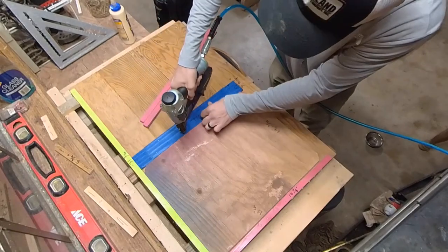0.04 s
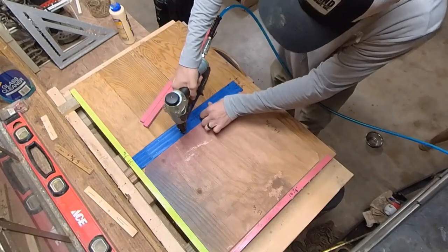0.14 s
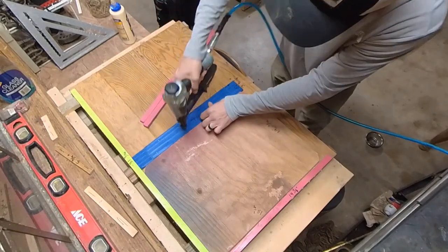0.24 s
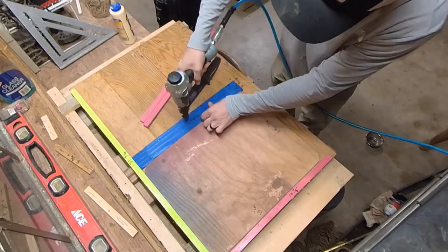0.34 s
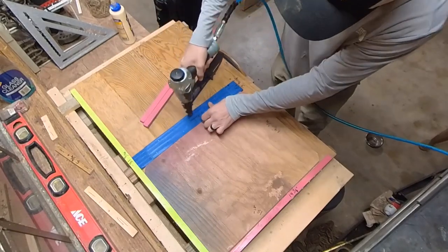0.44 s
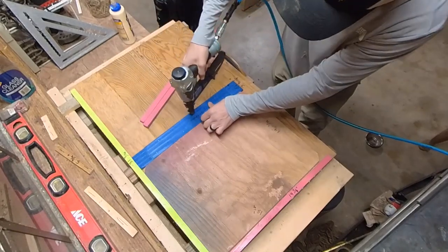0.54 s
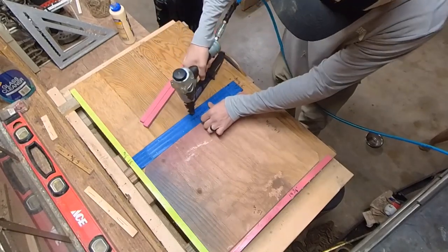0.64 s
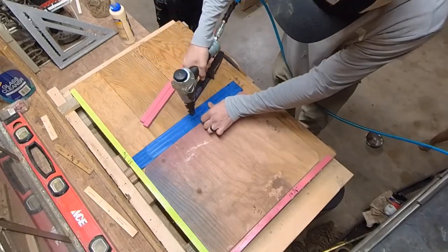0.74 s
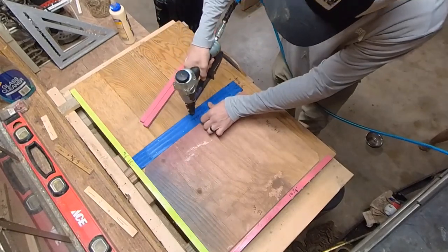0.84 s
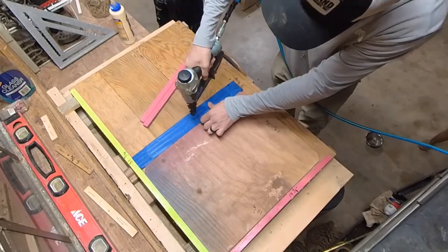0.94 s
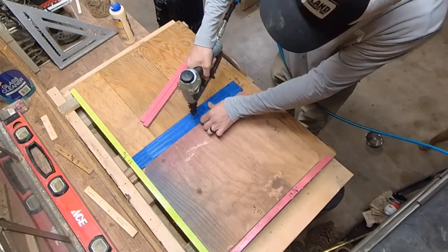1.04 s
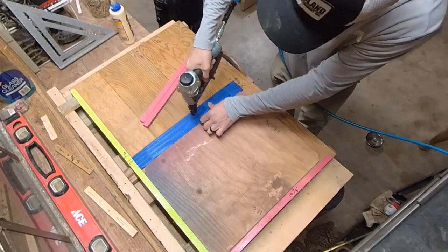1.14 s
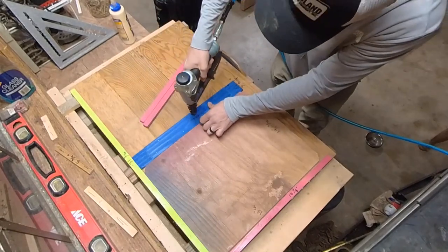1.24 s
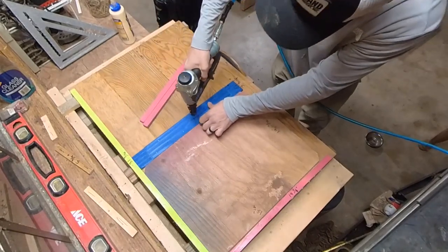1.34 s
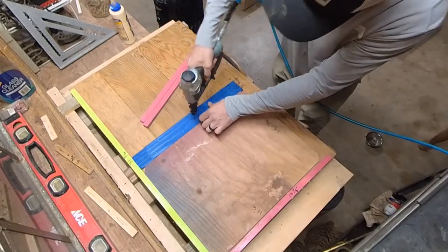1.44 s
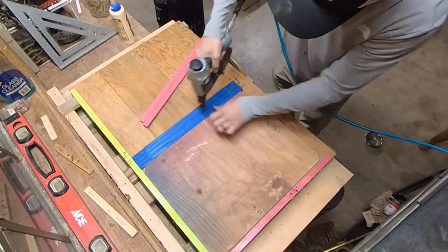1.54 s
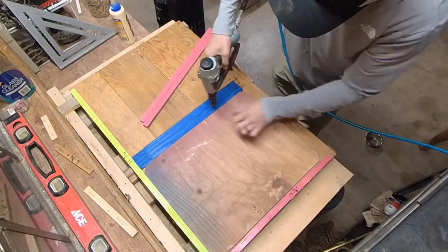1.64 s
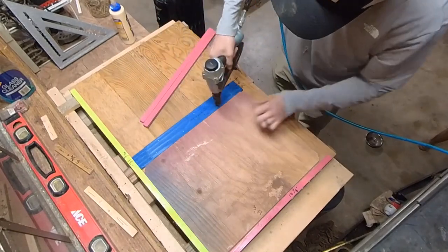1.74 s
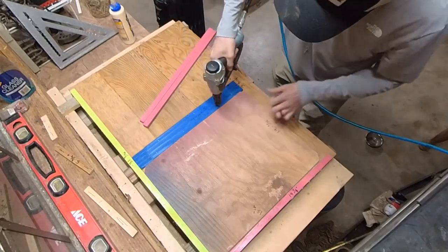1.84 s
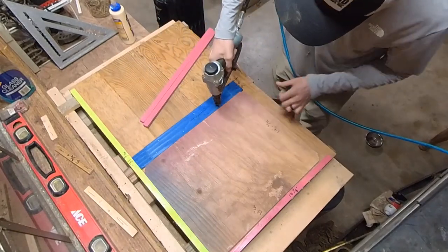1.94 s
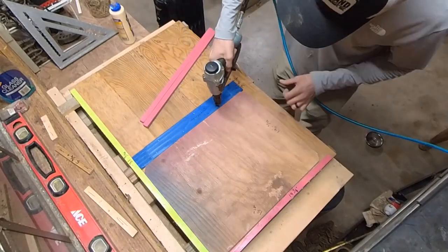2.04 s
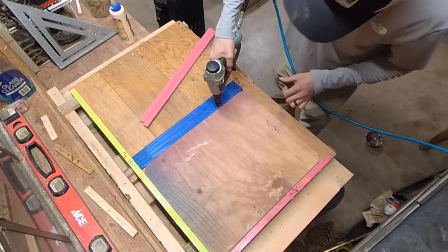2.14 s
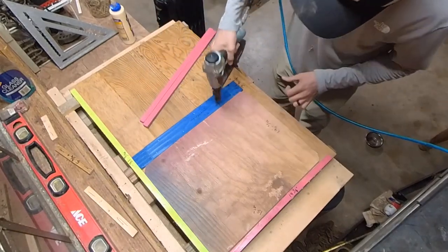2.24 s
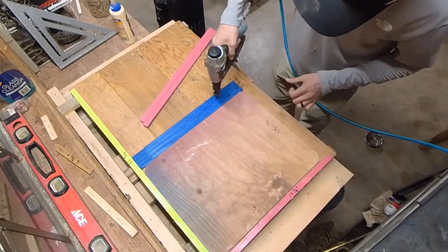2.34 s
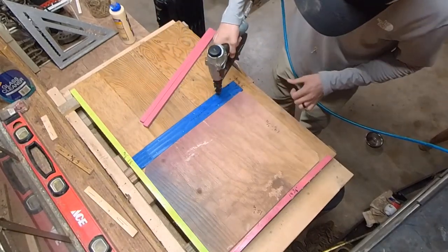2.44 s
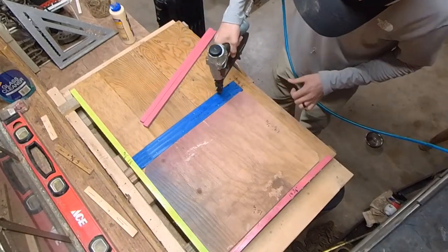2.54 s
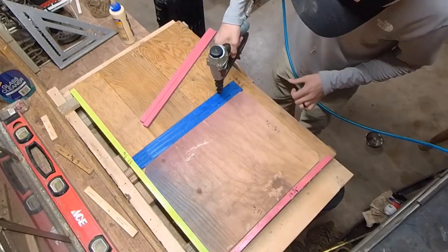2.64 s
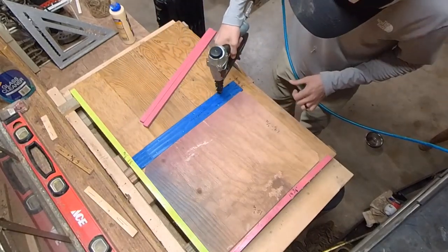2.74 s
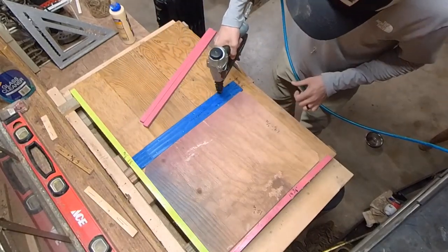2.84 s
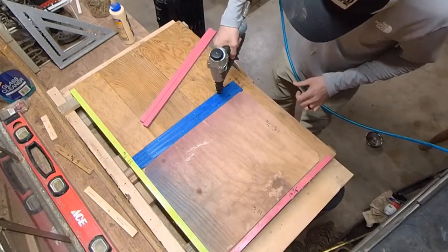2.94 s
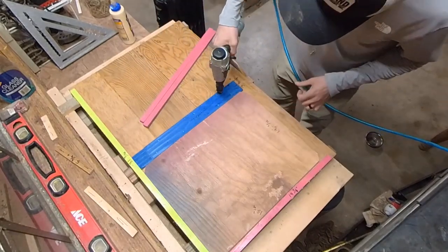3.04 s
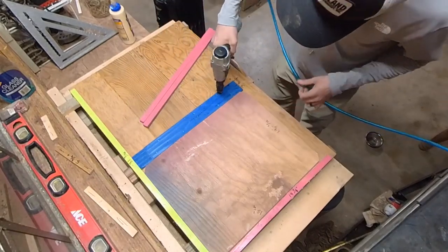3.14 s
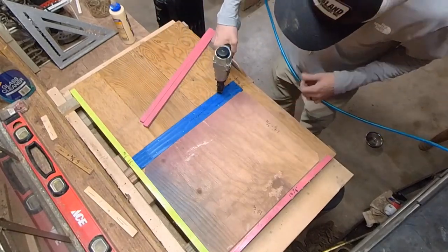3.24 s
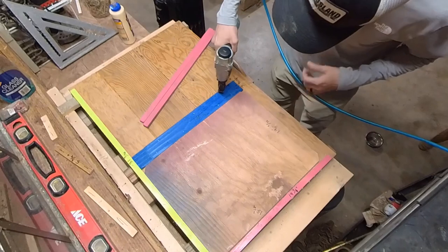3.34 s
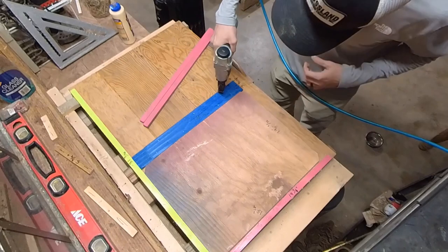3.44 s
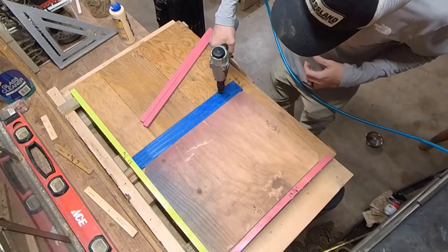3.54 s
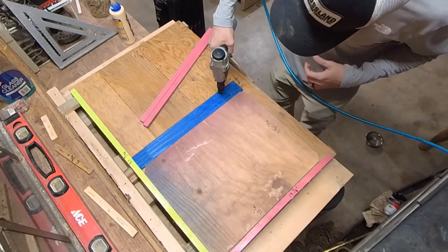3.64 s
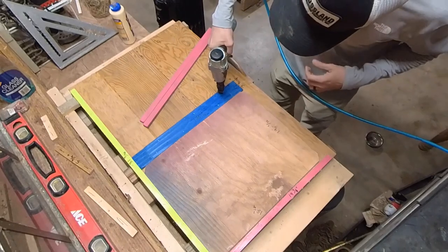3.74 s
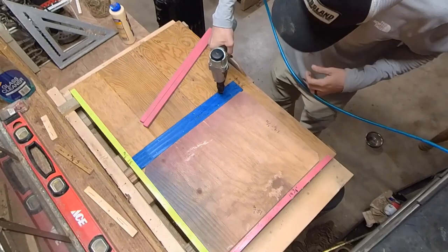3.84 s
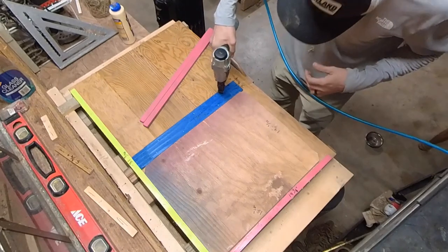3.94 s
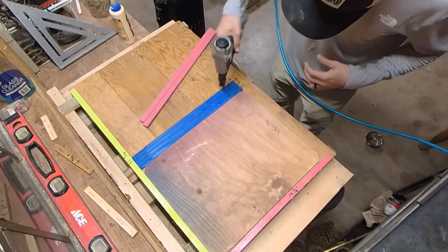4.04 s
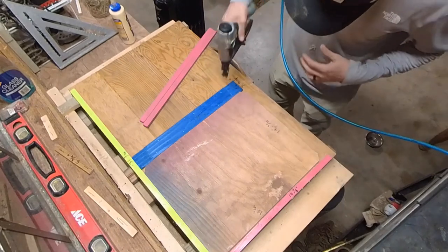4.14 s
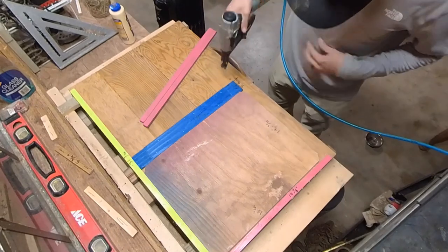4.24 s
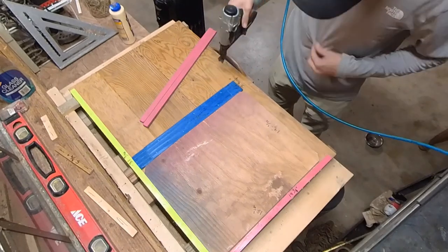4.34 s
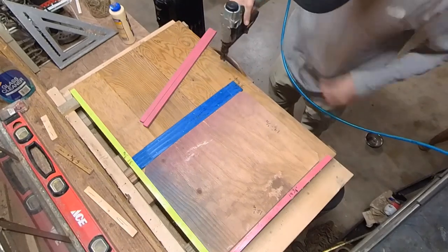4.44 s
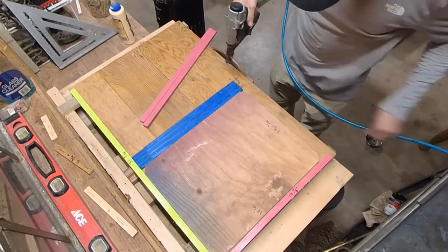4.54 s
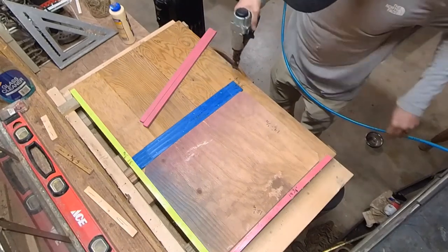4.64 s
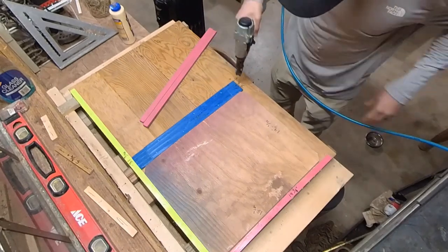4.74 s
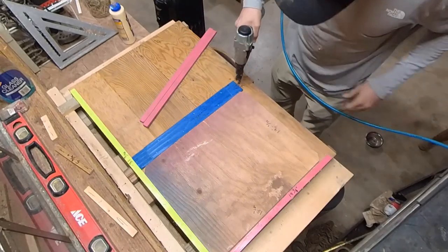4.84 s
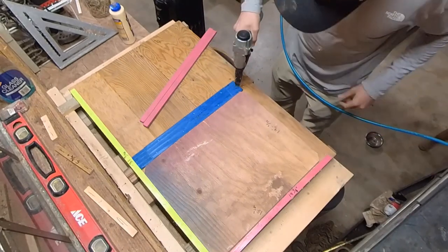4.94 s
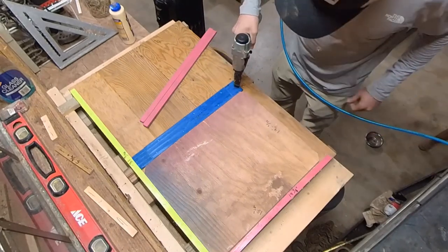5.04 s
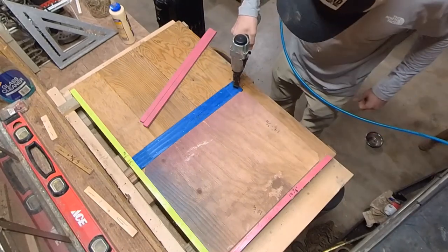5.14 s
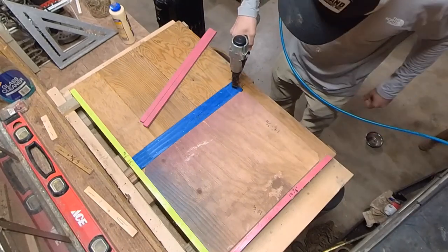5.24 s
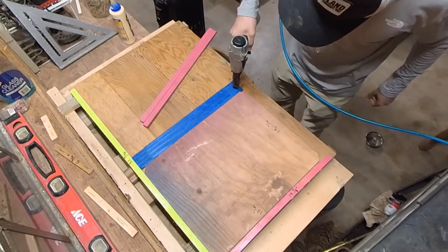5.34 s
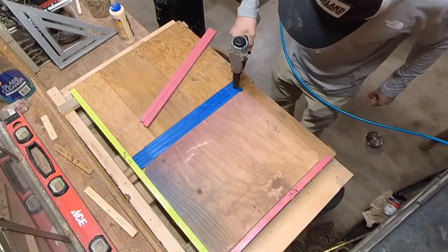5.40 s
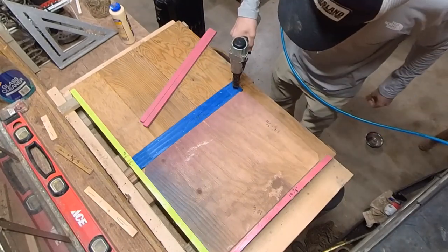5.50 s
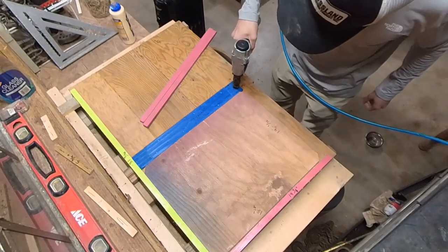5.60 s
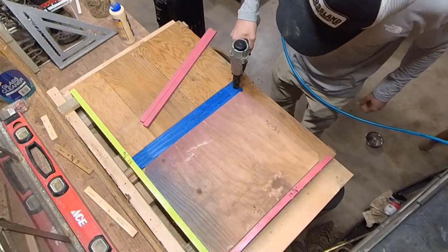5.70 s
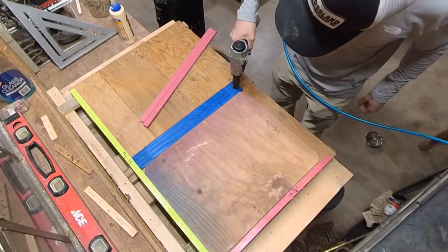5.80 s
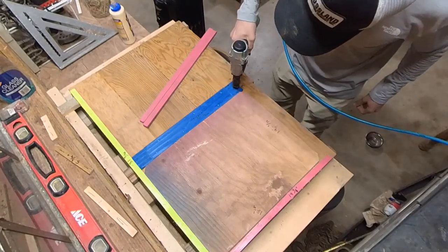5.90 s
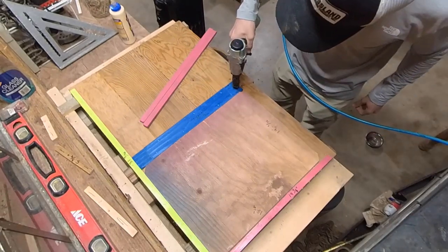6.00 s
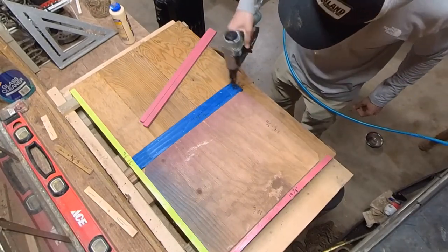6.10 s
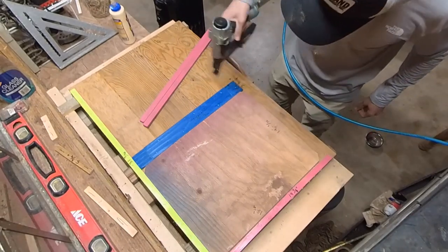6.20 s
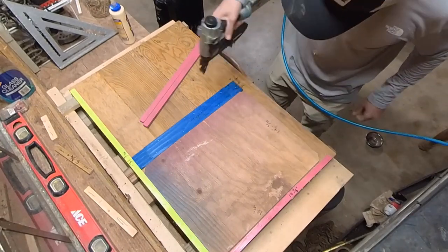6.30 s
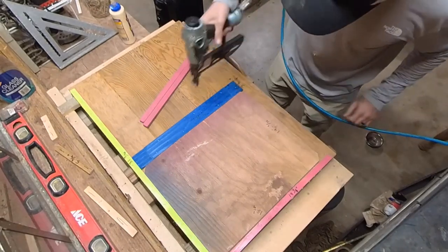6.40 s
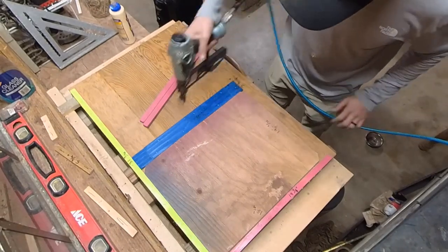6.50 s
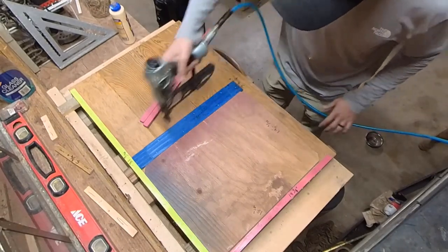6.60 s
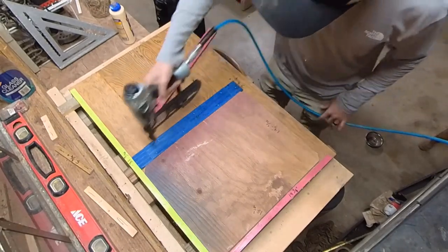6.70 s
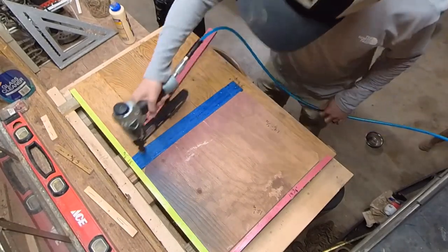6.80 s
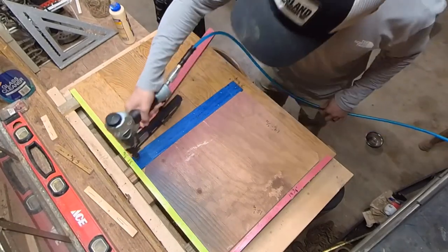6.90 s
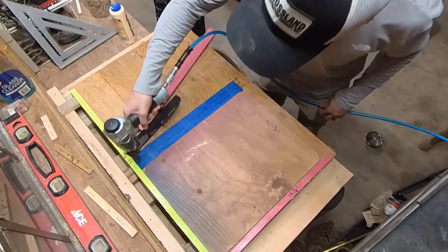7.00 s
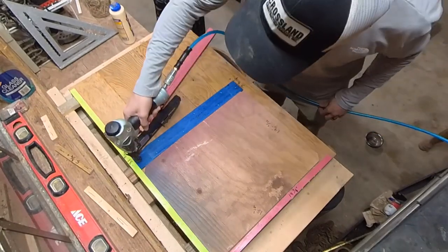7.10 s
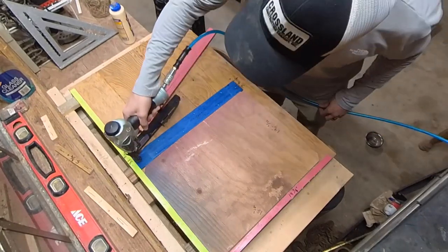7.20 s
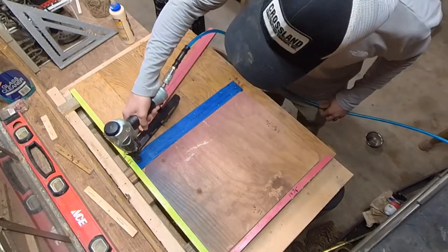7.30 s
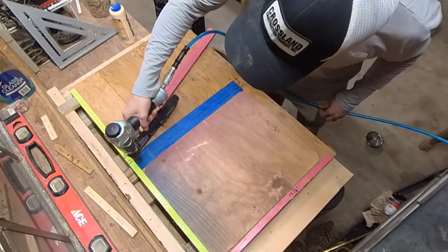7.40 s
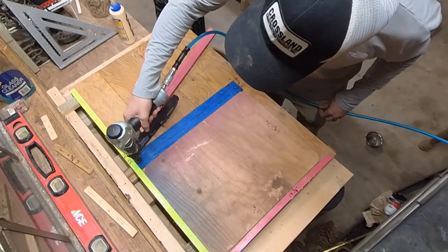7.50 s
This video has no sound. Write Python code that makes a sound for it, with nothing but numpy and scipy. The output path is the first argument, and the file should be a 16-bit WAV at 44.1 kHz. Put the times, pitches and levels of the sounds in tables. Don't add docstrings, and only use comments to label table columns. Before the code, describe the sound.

Recorded close by a small camera in a workshop with a brief, quickly damped reverb and near-silent air. A tool nose scuffs and knocks plywood at 0-0.1 s while the bench sways low. At 0.23 s a pneumatic stapler fires: trigger tick, sharp crack through staple and wood, bumper thud, bright steel ping, then about 0.1 s later a very short air hiss thumping the microphone and a dull piston rap. Light taps follow, with firmer knocks just before the hardest crack at 1.48 s. More knocks at 1.9-2.1 s lead to a duller shot at 2.22 s. Soft knocks, hums and rattles fill the pause until a strong shot at 4.0 s with the loudest puff. Another quiet stretch ends in knocks around 5.7-5.8 s, then the last, ringing shot at 6.14 s. Afterwards low sway fades, a hose chirps near 6.9 s, and faint taps and scrapes continue to 7.5 s.

```python
import sys
import numpy as np
from scipy import signal
from scipy.fft import rfft, irfft, next_fast_len
from scipy.io import wavfile
from scipy.ndimage import uniform_filter1d

SR = 44100
rng = np.random.default_rng(int(sys.argv[2]) if len(sys.argv) > 2 else 0)


def pcm_store(signal):
    levels = np.round(np.clip(np.atleast_2d(signal), -1, 1) * 32767)
    wavfile.write(sys.argv[1], SR, levels.astype(np.int16).T)


def volts_from_decibels(level):
    exponent = np.asarray(level, float) / 20
    return 10 ** exponent


N = 333248
BUMPER_S = 0.0105

# driver_blow_s, driver_crack_db, bumper_crack_db, steel_ring_db, panel_shove_db
SHOTS = [
    (0.232, -14.5, -22, -19, -7),
    (1.478, -10.5, -18.5, -23.5, -5),
    (2.2237, -13.5, -14.5, -31, -7),
    (3.9982, -11, -12.5, -20.5, -5.5),
    (6.138, -11.5, -15.5, -16.5, -6),
]
# start_s, hiss_rms_db, length_s, piston_lands_after_s, piston_crack_db
EXHAUST = [
    (0.333, -28, 0.026, .028, -24.5),
    (1.571, -32.5, .022, 0.029, -25),
    (2.324, -33, 0.039, .029, -17.5),
    (4.097, -26, 0.02, 0.029, -23.5),
    (6.216, -26.5, 0.03, .031, -24.5),
]
# time_s, share_0_to_1, stereo_width_db
WIND_MODE = [(0, 0.25, -6), (0.191, 0, -34), (.2, 0.16, -30.5), (.33, 0, -34), (0.346, 0, 6.5),
             (.74, 0.99, 8), (0.8, 0.98, -16), (5.738, 0.88, -11.5), (5.79, 0, 4), (7.56, 0.03, 6.5)]


def unit(x):
    return x / np.sqrt(np.mean(x ** 2) + 1e-20)


def along(points, hz):
    f, v = np.transpose(points)
    return np.interp(np.log(hz + 1), np.log(f + 1), v)


def filtered(x, response):
    n = x.shape[-1]
    m = next_fast_len(n + 8192)
    return irfft(rfft(x, m) * response(np.fft.rfftfreq(m, 1 / SR)), m)[..., :n]


def coloured(x, spectrum):
    return filtered(x, lambda hz: volts_from_decibels(along(spectrum, hz)))


def add(track, s, x):
    part = track[max(round(s * SR), 0):][:len(x)]
    part += x[:len(part)]


def struck(force, modes, scatter_db, soft_hz=20000, near_hz=0):
    gains = volts_from_decibels(scatter_db * rng.standard_normal(len(modes)))
    if near_hz:
        gains = gains * volts_from_decibels(-14 * np.abs(np.log2(np.array(modes)[:, 0] / near_hz)))

    def body(f):
        total = 0
        for k, ((centre, width, db), gain) in enumerate(zip(modes, gains)):
            resonance = 1j * f * width / (centre * centre - f * f + 1j * f * width)
            total = total + (-1) ** k * gain * volts_from_decibels(db) * resonance
        return total / (1 + 1j * f / soft_hz) ** 2

    ring = filtered(force, body)
    return ring / np.abs(ring).max()


def shop(x, shut):
    # hz, t60_s
    decay = [(100, 1), (300, 0.58), (1000, 1), (3000, 0.66), (7000, 0.81)]
    # hz, level_db
    colour = [(100, -6), (200, -7.5), (400, -3.5), (1000, -9.5), (2500, 2), (4500, -3.5), (7000, -5)]
    hz, t, z = signal.stft(rng.standard_normal(SR * 3 // 4), SR, nperseg=256)
    hz = hz[:, None]
    fade_db = -60 * t / along(decay, hz)
    fade_db = fade_db - 20 * (t / shut * ((hz + 100) / 1000) ** 0.17) ** 4
    tail = signal.istft(z * np.abs(z) ** 0.3 * volts_from_decibels(fade_db), SR, nperseg=256)[1]
    tail = coloured(tail / np.linalg.norm(tail), colour)
    return signal.fftconvolve(np.pad(x, (150, 0)), tail)


def contacts(rows, metal, t60, soft_hz, chatter_db, shake, wet_db, shut, low_db, crack_db, metal_db):
    # centre_hz, width_hz, level_db
    bench_modes = [(77.4, 79, -12), (108.3, 7.9, 7), (147, 56, -10.5)]
    panel_modes = [(175.25, 8.7, -2), (215, 9, -14), (255.4, 6.8, -13), (296.1, 12, -1.5), (364, 28, -1.5)]
    wood_modes = [(456, 30, -1), (625, 40, 0.5), (717, 24, -1), (940, 160, -4.5), (1187, 210, -4.5),
                  (1660, 310, -7.5), (1840, 390, -6.5), (2840, 300, -8.5), (3700, 910, -15)]
    out, t = np.zeros(N), np.arange(SR // 5) / SR
    u = t[:800]
    for s, db, boom, panel, steel, panel_hz in rows:
        chatter = rng.standard_normal((2, len(t))) * volts_from_decibels(-60 * t / t60)
        force = volts_from_decibels(chatter_db) * chatter[0] + (t == 0)
        rattle = chatter[1] * (shake + volts_from_decibels(-60 * t / 0.04))
        sound = volts_from_decibels(boom + low_db) * struck(force, bench_modes, scatter_db=8.5, soft_hz=155)
        sound += volts_from_decibels(panel + low_db) * struck(force, panel_modes, scatter_db=7.5, soft_hz=396, near_hz=panel_hz)
        sound += volts_from_decibels(crack_db) * struck(force, wood_modes, scatter_db=1.0, soft_hz=soft_hz)
        sound += volts_from_decibels(steel + metal_db) * struck(rattle, metal, scatter_db=3.0)
        add(out, s + 0.0007, volts_from_decibels(db) * sound)
        pushes = [(panel - 12.5, panel_hz, 0.017),
                  (crack_db + 11.5, 800, 0.0002 + 0.45 / soft_hz),
                  (crack_db - 9.0 - 6000 / soft_hz, 3000, 0.00025),
                  (steel + metal_db + 3.5, 5800, 0.00008)]
        burst = sum(volts_from_decibels(push_db) * np.sin(2 * np.pi * hz * u) * np.exp(-u / decay)
                    for push_db, hz, decay in pushes)
        add(out, s, volts_from_decibels(db + wet_db) * shop(burst, shut))
    return out


def ringing(rows, width):
    out, t = np.zeros(N), np.arange(SR // 3) / SR
    for s, hz, db, length in rows:
        noise = rng.standard_normal(len(t))
        tone = filtered(noise, lambda f: np.exp(-((f - hz) / (width * hz)) ** 2))
        tone = tone / np.std(tone[:round(length * SR) + 40])
        envelope = (1 - np.exp(-t / 0.0009)) * np.exp(-(t / length) ** 2 * 1.5)
        add(out, s, volts_from_decibels(db) * tone * envelope)
    return out


def hush():
    # hz, density_db_per_hz
    air_colour = [(18, -24.5), (30, 0.5), (65, -10.5), (97, -21.5), (161, -20), (214, -25), (293, -27.5),
                  (1230, -43.5), (6460, -46.5), (9260, -64), (12000, -109), (20400, -120)]
    s, share, _ = np.transpose(WIND_MODE)
    air = unit(coloured(rng.standard_normal(N), air_colour))
    hiss = coloured(air, [(500, -36.0), (1200, -2.0)])
    opened = 1 - np.interp(np.arange(N) / SR, s, share)
    return volts_from_decibels(-67.0) * (air + 0.5 * opened * hiss)


def scrape():
    # loudest_s, scuff_db, hiss_rel_db, rise_s, fall_s (per 20 dB)
    strokes = [(0.001, -41.5, -10, 0.0066, 0.041), (0.06, -52, -8, 0.0204, 0.23),
               (1.32, -46, -18.5, 0.035, 0.0025), (2.842, -47, -27, 0.005, 0.18),
               (3.452, -55.5, -35, 0.033, 0.082), (5.719, -51.5, -27, 0.051, 0.097),
               (5.768, -47, -20.5, 0.052, 0.0088), (6.666, -95.5, 13, 0.017, 0.032),
               (6.73, -82, 11.5, 0.1, 0.077), (6.79, -86.5, 9, 0.03, .06), (6.901, -99, 22, 0.045, 0.0086),
               (7.361, -68.5, 0, 0.08, 0.048), (7.489, -69.5, -1, 0.1, 0.22)]
    # hz, density_db_per_hz
    hiss_colour = [(900, -15.5), (1600, -1.5), (3000, -5), (6500, -6), (9000, -13)]
    scuff_colour = [(120, -20), (300, 12.5), (500, -9.5), (900, -29), (1500, -46.5)]
    t = np.arange(N) / SR
    hiss_level, scuff_level = np.zeros(N), np.zeros(N)
    for s, db, hiss_db, rise, fall in strokes:
        stroke = volts_from_decibels(db - 20 * np.abs(t - s) / np.where(t < s, rise, fall))
        hiss_level += volts_from_decibels(hiss_db) * stroke
        scuff_level += stroke
    roughness = volts_from_decibels(1.5 * unit(uniform_filter1d(rng.standard_normal(N), size=120)))
    grains = rng.standard_normal((2, N)) * roughness
    hiss = hiss_level * unit(coloured(grains[0], hiss_colour))
    return hiss + scuff_level * unit(coloured(grains[1], scuff_colour))


def knocks():
    # time_s, crack_peak_db, body_rel_db, staple_rattle_rel_db
    on_bench = [(1.328, -29, 6.5, -28), (1.361, -33.5, 3.5, -12.5), (1.376, -44.5, 0.5, -23),
                (2.054, -25.5, 0.5, -39.5), (2.113, -42, 13, -28), (2.139, -49.5, 20, -29),
                (2.894, -69.5, 29.5, 2.5), (2.972, -34.5, 9, -32), (3.046, -53, 11, -48),
                (3.228, -65.5, 25, -2), (3.461, -64.5, 15, -29), (3.708, -65.5, 25, -35),
                (3.889, -65, 18, -33), (5.252, -61.5, 26, -21.5), (5.264, -65.5, 7, -14),
                (5.625, -64, 20, -15.5), (5.772, -34, 14.5, -22), (5.819, -38, 10.5, -7.5),
                (6.912, -69, 5, 14.5), (7.46, -54.5, 4.5, -8), (7.521, -64, 11, -21),
                (7.542, -60.5, 0, -10.5)]
    on_edge = [(0.05, -38, 7, -5.5), (0.066, -28.5, -3, -39), (0.098, -44.5, 10, -4.5),
               (1.018, -62, 18.5, -8.5), (1.06, -66, 7, -34.5), (1.096, -55, -3, -38),
               (2.1, -42, 12.5, -17), (2.687, -49, -4.5, -15), (4.62, -59, 1.5, -21),
               (5.594, -68, 14.5, -28), (6.668, -60, -4, -11.5), (7.389, -54.5, -8, -10)]
    on_middle = [(0.001, -48.5, 0.9, -37), (0.821, -40.5, 0.5, -23), (1.915, -28, -1.5, -30.5),
                 (5.289, -63, 10.5, -10.5), (2.809, -58, 5, -5), (2.821, -51, 14.5, -14),
                 (3.134, -60, 10.5, -35), (3.616, -58.5, 12, -15), (3.779, -73, 20.5, -21),
                 (5.462, -51.5, 11, -11), (5.554, -63, 17.5, -37), (5.714, -64, -4, -2),
                 (7.302, -47.5, 2.5, -12), (7.328, -61, 11, -31), (7.419, -52.5, 9, -2.5)]
    # boom_db, panel_db, panel_hz
    spots = [
        (-1, -9, 220),
        (-2.5, -0.5, 180),
        (-2.5, -1.5, 260),
    ]
    # centre_hz, width_hz, level_db
    staples = [(1650, 18, 2.5), (2090, 12, 0), (2460, 730, -2), (3550, 46, -0.5), (4100, 640, -4.5),
               (5080, 370, -1.5), (5950, 1300, -4.5), (6936, 280, 0), (8050, 410, -9)]
    rows = []
    for hits, (boom_db, panel_db, hz) in zip((on_bench, on_edge, on_middle), spots):
        for s, db, body, rattle in hits:
            rows.append((s, db, body + boom_db, body + panel_db, rattle, hz))
    return contacts(sorted(rows), staples, t60=0.2, soft_hz=880, chatter_db=-27.0, shake=0.53,
                    wet_db=0.5, shut=0.14, low_db=-1.0, crack_db=-10.5, metal_db=9.5)


def boards():
    # start_s, pitch_hz, rms_db, length_s
    hums = [(0.055, 620, -41, 0.024), (0.215, 440, -39, 0.024), (.61, 163, -60, 0.16),
            (0.8205, 610, -62, 0.07), (.8645, 730, -66, 0.067), (1.023, 236.3, -51.5, 0.056),
            (1.256, 700, -79.5, .07), (1.325, 780, -49, 0.016), (1.3308, 292, -39.5, .09),
            (1.4898, 110, -35.5, 0.043), (1.4903, 520, -32, 0.01), (1.9156, 300, -45, 0.059),
            (1.9305, 520, -57.5, 0.16), (2.8195, 720, -65, 0.051), (2.8217, 520, -60.5, 0.092),
            (3.053, 790, -71.5, 0.089), (3.1375, 634, -70.5, 0.059), (3.239, 114, -52, 0.062),
            (3.434, 524, -70.5, .04), (3.4465, 750, -79, 0.062), (3.628, 300, -56, .05),
            (3.7735, 292, -61, .05), (3.8905, 301, -62.5, .05), (4.003, 410, -33, 0.02),
            (4.351, 151, -60, 0.19), (4.51, 116, -67.5, 0.14), (5.2485, 310, -52.5, 0.064),
            (5.2712, 480, -62, 0.04), (5.2735, 701.7, -69.5, 0.063), (5.4585, 334, -59, 0.051),
            (5.4603, 530, -61.5, .06), (5.461, 113, -44.5, 0.07), (5.466, 754, -71, 0.052),
            (5.595, 520, -66, 0.036), (5.632, 620, -75, 0.029), (5.72, 717, -68, 0.05),
            (5.775, 720, -49.5, 0.027), (5.8105, 300, -49.5, 0.091), (5.831, 721, -64.5, 0.064),
            (6.14, 720, -32, 0.021), (6.44, 177.1, -60, 0.3), (6.511, 106, -60.5, 0.15),
            (6.6755, 800, -74.5, .12), (6.76, 127, -66, 0.17), (7.3064, 126, -58.5, 0.17),
            (7.3085, 263, -47.5, 0.055), (7.424, 259.4, -65.5, 0.042), (7.4254, 510, -56, 0.024)]
    return ringing(hums, width=0.09)


def sway():
    # crest_s, low_mode_db, high_mode_db, swell_s, t60_s
    swells = [
        (0.135, -34.5, -44, 0.084, 0.5),
        (0.713, -47.5, -45, 0.18, 1.63),
        (1.399, -32.5, -39.5, 0.06, 0.11),
        (2.611, -51, -50, 0.11, 0.89),
        (3.062, -39, -38.5, 0.071, 1.34),
        (3.689, -64, -40.5, 0.045, 0.37),
        (4.387, -42.5, -43.5, 0.076, 1.4),
        (5.904, -42, -35, 0.14, 1.72),
        (6.566, -35.5, -46, 0.14, 1.9),
        (7.371, -50, -60.5, 0.033, 0.6),
    ]
    mode_hz = [44.7, 61.4]
    out, t = np.zeros(N), np.arange(N) / SR
    for s, low_db, high_db, swell, t60 in swells:
        rise = np.exp(-((t - s) / swell) ** 2 * 0.64)
        size = np.where(t < s, rise, volts_from_decibels(-60 * np.abs(t - s) / t60))
        for hz, db in zip(mode_hz, (low_db, high_db)):
            out += size * volts_from_decibels(db) * np.cos(2 * np.pi * hz * (t - s))
    return out


def tool_parts():
    # time_s, crack_db, panel_rel_db, steel_rel_db, panel_hz
    pulls = [
        (0.212, -24, -5.5, -13, 359.1),
        (0.221, -32, -1, -8, 159.6),
        (1.457, -27, 0, -15, 382),
        (1.468, -24, 2, -12, 202.7),
        (2.203, -29.5, -2, -17.5, 248),
        (2.212, -34, -4, -16.5, 305),
        (3.978, -27, 0.5, -18.5, 165.7),
        (3.987, -28.5, 1, -13, 301.6),
        (6.117, -26, -4, -18.5, 160.4),
        (6.126, -26, 4, -4, 165),
    ]
    # centre_hz, width_hz, level_db
    steel_modes = [(3300, 2900, -1.5), (4800, 360, 1.5), (6070, 1300, 0.5), (6850, 1800, -3)]
    # time_s, crack_db, boom_rel_db, panel_rel_db, steel_rel_db, panel_hz
    rows = [(s, db, -6.5, panel, steel, hz) for s, db, panel, steel, hz in pulls]
    for s, driver_db, bumper_db, steel_db, shove_db in SHOTS:
        boom, panel = shove_db - 26.5 - driver_db, shove_db - 13 - driver_db
        rows.append((s, driver_db, boom, panel, steel_db - 7.5 - driver_db, 355))
        rows.append((s + BUMPER_S, bumper_db, -11.5, -8.5, steel_db - bumper_db, 280))
    rows += [(s + wait, db - 3, -8, -10, -26, 340) for s, _, _, wait, db in EXHAUST]
    return contacts(sorted(rows), steel_modes, t60=0.082, soft_hz=6540, chatter_db=-24.0, shake=0.4,
                    wet_db=8.0, shut=0.61, low_db=-3.0, crack_db=-5.0, metal_db=7.0)


def pings():
    # start_s, pitch_hz, peak_db
    nose_pings = [(0.2215, 4640, -28), (0.241, 4850, -10), (0.2415, 3660, -17.5), (0.2415, 6372, -24),
                  (6.149, 6300, -16), (6.15, 3880, -27), (2.203, 4500, -32), (2.2155, 4600, -37.5),
                  (7.419, 6200, -42), (7.419, 6800, -47), (7.419, 5460, -44), (7.419, 4120, -49),
                  (7.462, 4100, -50)]
    out, t = np.zeros(N), np.arange(SR // 20) / SR
    for s, hz, db in nose_pings:
        envelope = volts_from_decibels(db - 60 * t / 0.018) * (1 - np.exp(-t / 0.001))
        add(out, s, envelope * np.sin(2 * np.pi * hz * t))
    return out


def thumps():
    out, t = np.zeros(N), np.arange(SR // 20) / SR
    double = 0.55 * (1 - np.exp(-t / 0.0005)) * np.cos(2 * np.pi * 1500 * (t - 0.0004))
    driver = np.exp(-(t / 0.0027) ** 4) * (np.sin(2 * np.pi * 400 * t) + double)
    bumper = np.exp(-(t / 0.0047) ** 4) * (1 - np.exp(-(t / 0.0005) ** 2))
    bumper = bumper * np.cos(2 * np.pi * 200 * (t - 0.0007))
    for s, driver_db, _, _, shove_db in SHOTS:
        add(out, s, volts_from_decibels(driver_db + 0.5) * driver)
        add(out, s + BUMPER_S - 0.0002, volts_from_decibels(shove_db - 1.2) * bumper)
    return out


def sheet():
    # centre_hz, width_hz, level_db
    sheet_modes = [(520, 19, -4), (607, 30, 1), (941.4, 60, -4), (1100, 21, -3.5), (1260, 35, -6.5),
                   (1525, 12, -13), (1623, 150, -7), (2000, 45, -5.5), (2210, 39, -10), (2540, 92, -11),
                   (2900, 40, -13), (3170, 35, -13.5), (3380, 30, -16.5), (3910, 150, -15.5)]
    # driver_db, bumper_db, piston_db, favoured_hz
    hits = [
        (-24, -28.5, -29, 5200),
        (-18.5, -23.5, -29, 1550),
        (-21.5, -29, -31.5, 1700),
        (-16.5, -10, -39, 780),
        (-14.5, -24.5, -23, 1470),
    ]
    out, t = np.zeros(N), np.arange(SR // 5) / SR
    for (s, *_), (air_s, _, _, wait, _), (*blows_db, near_hz) in zip(SHOTS, EXHAUST, hits):
        modes = [(hz, w, db - 5 * abs(np.log2(hz / near_hz))) for hz, w, db in sheet_modes]
        for at, db in zip((s, s + BUMPER_S, air_s + wait), blows_db):
            force = (t == 0) + volts_from_decibels(-26) * rng.standard_normal(len(t)) * volts_from_decibels(-60 * t / 0.047)
            ring = volts_from_decibels(db) * struck(force, modes, scatter_db=3, soft_hz=4000)
            add(out, at + 0.0007, ring)
            add(out, at, volts_from_decibels(-9.0) * shop(ring, shut=0.21))
    return out


def exhaust():
    # hz, density_db_per_hz
    jet = [(1500, -22), (3500, -11), (5000, -4), (6500, 3.5), (8000, -5.5), (12000, -10)]
    out, t = np.zeros(N), np.arange(SR // 8) / SR
    for s, db, length, *_ in EXHAUST:
        choke = 1 + np.exp(np.minimum((t - length) / 0.0046, 50))
        flow = (1 - np.exp(-t / 0.0017)) * np.exp(-t / 0.046) / choke
        hiss = volts_from_decibels(db) * flow * unit(coloured(rng.standard_normal(len(t)), jet))
        add(out, s, hiss)
        add(out, s, volts_from_decibels(-3.5) * shop(hiss, shut=0.55))
    return out


def jabs():
    # start_s, jab_db, width_s, swing_back_db
    eddies = [(0.3349, -11.5, 0.0013, -40), (0.337, -10, 0.00089, -10), (1.5724, -23.5, 0.00064, -33.5),
              (1.581, -11, 0.00058, -15), (2.3260, -12, 0.001, -36.5), (2.329, -7, 0.0012, -10.5),
              (2.34, -16.5, .004, -37.5), (2.342, -17.5, 0.00074, -38), (4.0996, -14.5, 0.0009, -38),
              (4.1005, -12.5, 0.00091, -23.5), (4.1048, -15.5, 0.00081, -45), (4.1060, -13, 0.00071, -16),
              (4.1088, -5, .001, -10.5), (6.224, -11.5, 0.00088, -16), (6.2309, -16, 0.001, -38.5)]
    out, t = np.zeros(N), np.arange(SR // 20) / SR
    swing = -(1 - np.exp(-(t / 0.00044) ** 2)) * np.cos(2 * np.pi * 47 * t) * np.exp(-(t / 0.014) ** 3)
    for s, db, width, swing_db in eddies:
        u = t / (0.55 * width)
        push = (u * np.exp(1 - u)) ** 1.3
        add(out, s, volts_from_decibels(db) * push + volts_from_decibels(swing_db - 2.0) * swing)
    return out


def landings():
    # start_s, pitch_hz, rms_db, length_s
    raps = [
        (.361, 1000, -34.5, 0.02),
        (1.599, 1000, -38.5, 0.028),
        (2.35, 1000, -34, 0.015),
        (4.123, 800, -31.5, .017),
        (6.245, 1100, -36, .012),
    ]
    return ringing(raps, width=0.9)


def casing():
    # start_s, pitch_hz, rms_db, length_s
    body_rings = [(0.8204, 1130, -63.5, 0.07), (.8215, 1500, -65.5, 0.027), (0.8222, 2580, -68, 0.046),
                  (1.019, 1301, -78.5, 0.029), (1.0206, 2080, -84, 0.06), (1.0905, 1300, -81, 0.054),
                  (1.3275, 1320, -48.5, .015), (1.3475, 1250, -62, 0.016), (1.994, 1510, -74, .02),
                  (2.809, 1900, -71, 0.037), (2.824, 1800, -73, 0.052), (3.0825, 1100, -79, 0.041),
                  (3.2235, 2160, -78, 0.024), (3.2305, 1200, -82, 0.055), (3.6185, 1260, -77, 0.067),
                  (5.2905, 1620, -81, 0.04), (5.46, 1200, -81, .05), (5.7705, 887, -61, 0.033),
                  (5.815, 1758, -71, 0.11), (6.5755, 4196, -75, 0.047), (6.666, 3300, -74.5, 0.017),
                  (6.6675, 3400, -84, 0.056), (6.6905, 1120, -75.5, 0.1), (6.7005, 2430, -80, 0.11),
                  (6.782, 2880, -77, .02), (6.8225, 3430, -83, 0.022), (6.8305, 4150, -80.5, 0.017),
                  (6.905, 2396, -82, 0.026), (7.31, 1360, -61.5, 0.03), (7.394, 3700, -79, 0.017),
                  (7.518, 1410, -59, 0.018), (7.5455, 1450, -70, 0.011)]
    return ringing(body_rings, width=0.09)


def magazine():
    # start_s, rms_db, length_s, treble_db_per_octave
    shakes = [(0.821, -74, 0.036, 0), (1.023, -90, 0.033, -12), (2.821, -70, 0.054, 5.5),
              (2.828, -72, 0.041, -2), (2.986, -67.5, 0.057, -4), (3.227, -87, 0.042, 7),
              (3.443, -82.5, 0.051, 0), (3.618, -82, 0.062, 16), (5.277, -82, 0.06, -0.5),
              (5.466, -70.5, 0.07, 2), (5.848, -75.5, 0.053, 13.5), (6.571, -75.5, 0.044, 5),
              (6.674, -78, 0.11, 3), (6.819, -91, 0.036, 13.5)]
    # pitch_hz, level_db
    pitches = [(1250, -5.5), (1780, -7.5), (2200, -10.5), (2550, -7.5), (3270, -7), (4200, -11.5)]
    rows = []
    for s, db, length, tilt_db in shakes:
        for hz, ring_db in pitches:
            level_db = db + ring_db + tilt_db * np.log2(hz / 2000) + rng.normal(0, 3)
            rows.append((s, hz, level_db, length))
    return ringing(rows, width=0.03)


def thuds():
    # start_s, pitch_hz, peak_db, t60_s
    low_rings = [
        (0.8227, 310, -34.5, 0.069),
        (2.058, 59.33, -24, .15),
        (2.1155, 111, -20.5, 0.25),
        (2.821, 331, -34, 0.14),
        (5.631, 110.3, -34, .3),
        (5.8249, 112.5, -21.5, .3),
        (3.715, 112, -36.5, 0.19),
    ]
    out, t = np.zeros(N), np.arange(SR // 3) / SR
    for s, hz, db, t60 in low_rings:
        envelope = volts_from_decibels(db - 60 * t / t60) * (1 - np.exp(-t * hz * 6))
        add(out, s, envelope * np.sin(2 * np.pi * hz * t))
    return out


def slats():
    # start_s, pitch_hz, rms_db
    slat_rings = [(0.83, 764, -63), (1.02, 576, -71), (1.075, 630, -62), (1.259, 1160, -81),
                  (2.976, 769, -52), (3.134, 496, -62.5), (3.229, 512, -76.5), (3.619, 532, -61.5),
                  (4.615, 722, -71)]
    return ringing([(*row, 0.05) for row in slat_rings], width=0.14)


def squeaks():
    # start_s, pitch_hz, rms_db, length_s
    hose = [
        (4.968, 1558, -84.5, 0.26),
        (5.596, 1650, -82, 0.037),
        (6.886, 4310, -75, 0.025),
        (6.912, 4430, -54.5, 0.0078),
        (6.915, 4740, -75, 0.08),
        (7.462, 4130, -69, 0.015),
    ]
    return ringing(hose, width=0.025)


def scene():
    # hz, level_db
    spread = [(2600, -68.5), (3100, -13.5), (4500, -9.5), (6200, -12.5), (6600, -32), (9000, -28)]
    air = hush() + scrape() + knocks() + boards() + tool_parts() + sheet() + exhaust()
    air += landings() + casing() + magazine() + slats() + squeaks()
    smear = rng.standard_normal(400) * volts_from_decibels(-60 * np.arange(400) / 150)
    side = coloured(signal.fftconvolve(air, smear / np.linalg.norm(smear))[:N], spread)
    mid = air + sway() + pings() + thumps() + jabs() + thuds()
    return np.array([mid + side, mid - side])


def top_cut(x):
    return signal.sosfilt(signal.butter(12, 15900, fs=SR, output="sos"), x)


def record(dry):
    # hz, level_db
    port_sum = [(1500, 1.5), (3000, -5), (3800, -12.5), (4500, -27), (5300, -21), (6200, -7), (7200, 6.5)]
    mic = [(20, -10.5), (40, 1), (7800, -1.5), (8600, -12.5), (9300, -24), (10000, -64), (16000, -64.5)]
    image = [(13600, -120), (14300, -51), (15700, -46.5), (16100, -120)]
    s, share, width_db = np.transpose(WIND_MODE)
    t = np.arange(N) / SR
    share = np.clip(np.interp(t, s, share), 0, 1)
    x = share * coloured(dry, port_sum) + (1 - share) * dry
    mid = x.mean(axis=0)
    side = (x[0] - x[1]) / 2 * volts_from_decibels(np.interp(t, s, width_db))
    x = coloured(np.array([mid + side, mid - side]), mic)
    mirror = 2 * x * np.cos(2 * np.pi * 22800 * t)
    loud = uniform_filter1d(np.abs(x[0]), size=900)
    mirror_gain = (0.3 + share) * np.minimum(loud / 0.06, 1) ** 2
    mix = x + coloured(mirror * mirror_gain, image)
    return top_cut(mix)


dry = scene()
out = record(dry)
pcm_store(out)
```